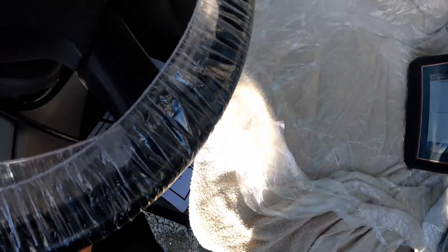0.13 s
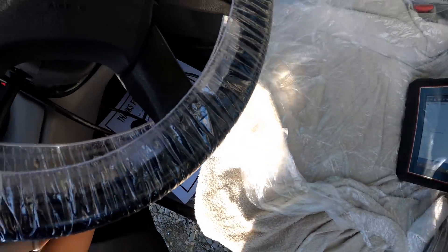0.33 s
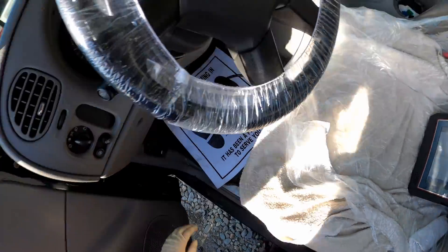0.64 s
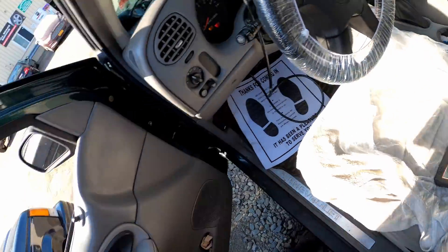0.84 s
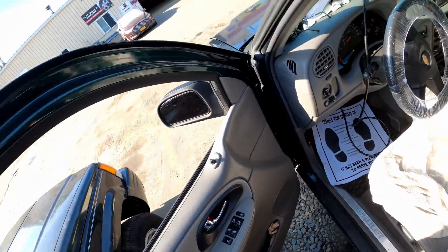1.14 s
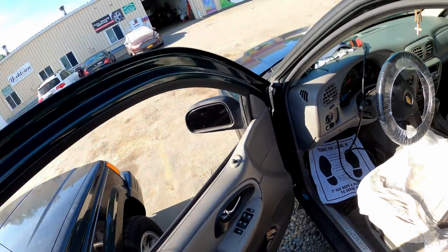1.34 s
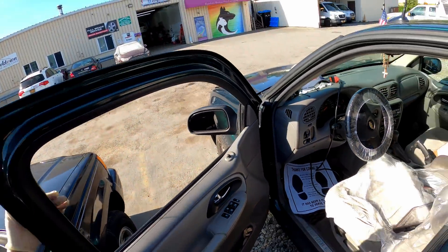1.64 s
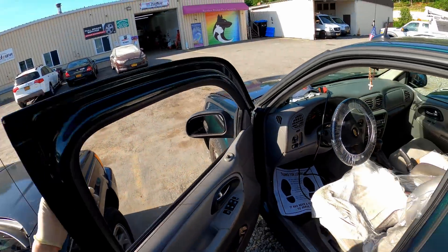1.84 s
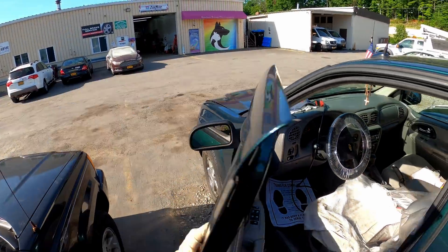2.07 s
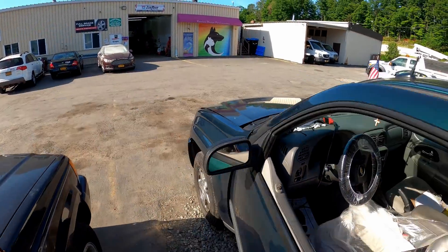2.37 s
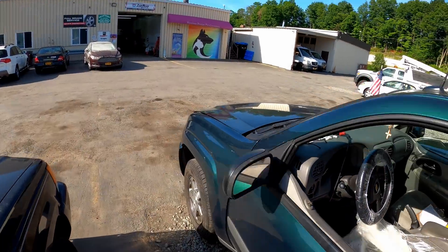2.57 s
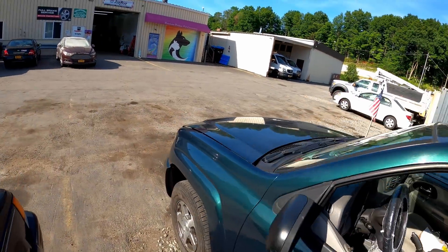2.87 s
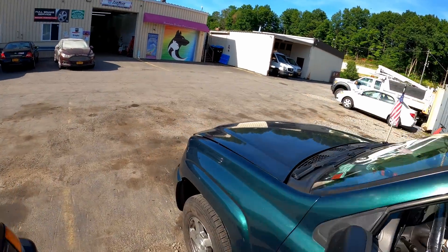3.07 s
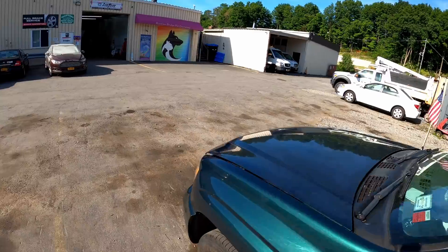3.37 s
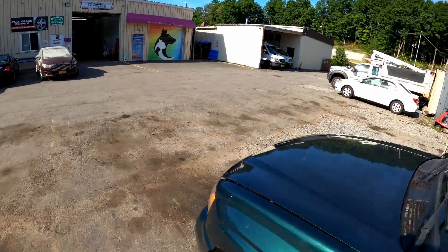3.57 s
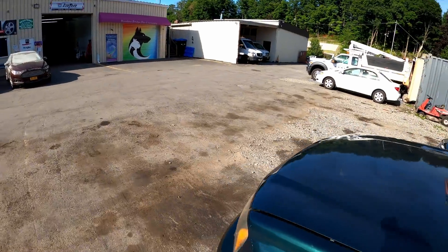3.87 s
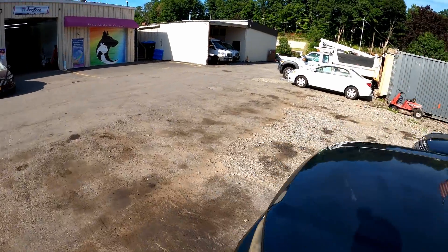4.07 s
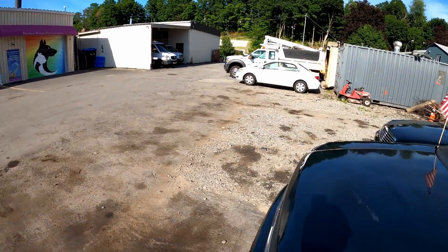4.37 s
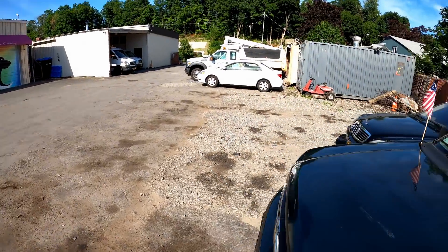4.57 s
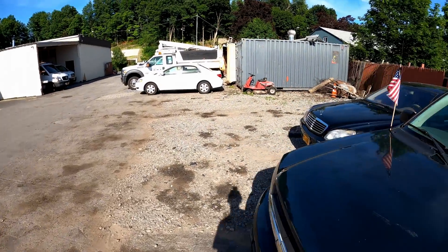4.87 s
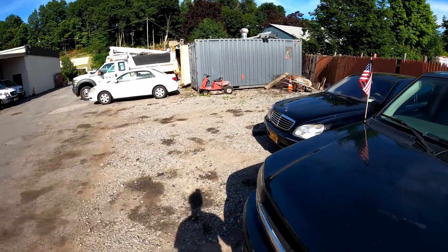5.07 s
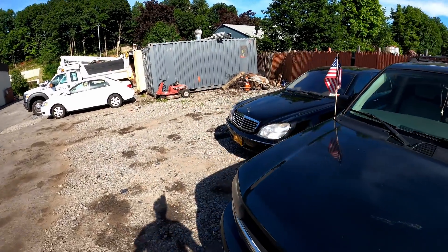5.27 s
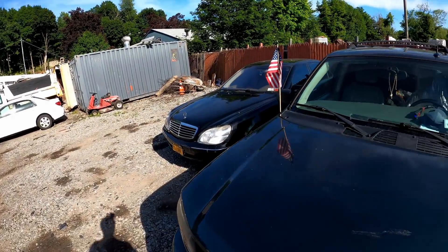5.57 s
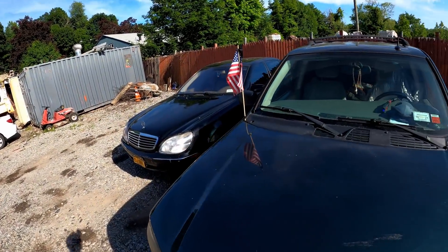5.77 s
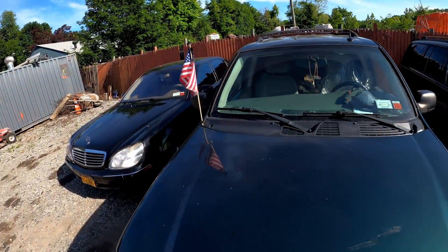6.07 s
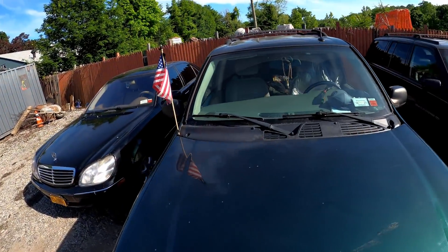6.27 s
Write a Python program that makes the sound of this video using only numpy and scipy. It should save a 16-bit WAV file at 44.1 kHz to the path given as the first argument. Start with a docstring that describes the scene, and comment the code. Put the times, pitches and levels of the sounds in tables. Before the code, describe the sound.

A car bonnet release snaps and the bonnet pops with a deep boom, shoes crunch on gravel in wind, a door slams, then a duller clunk.

```python
"""An open yard, heard from a windblown body-worn camera: a mechanic pulls a car's bonnet release, the bonnet
pops and the lever snaps back; he steps out onto gravel, slams the door, and at the front a duller clunk and
latch clicks follow. Metal is decaying modes, coloured noise and clicks; gravel is grains, stones and pebbles.
Wind is low swirling noise, the bird gliding raspy notes; squeaks, cloth and a distant wash lie underneath."""
import sys
import numpy as np
from scipy import signal
from scipy.fft import rfft, irfft, next_fast_len
from scipy.io import wavfile
from scipy.ndimage import map_coordinates

SR = 44100
rng = np.random.default_rng(int(sys.argv[2]) if len(sys.argv) > 2 else 0)


def pcm_store(signal):
    """Save signal as 16-bit PCM."""
    levels = np.round(np.clip(np.atleast_2d(signal), -1, 1) * 32767)
    wavfile.write(sys.argv[1], SR, levels.astype(np.int16).T)


N = 282681
TIME = np.arange(N) / SR  # s, the whole scene
RING = np.arange(32768) / SR  # s, the longest single ring

# Colour of lever and latch contacts. Each row: frequency in Hz, level in dB per Hz.
LEVER_COLOUR = [(120, -22), (250, -1.5), (700, 6.5), (1100, 5), (2100, -1.5), (4100, -4), (5200, -10.5),
                (7200, -10.5), (10000, -15), (13500, -21), (15500, -47.5)]
# How fast door and clunk sheet metal dies. Each row: frequency in Hz, t60 in s.
PANEL_DECAY = [(100, 0.36), (400, 0.16), (1200, 0.29), (4000, 0.21)]
# Colour of one stone on another. Each row: frequency in Hz, level in dB per Hz.
STONE_COLOUR = [(150, -20), (500, 6), (1300, 2.5), (4000, -4.5), (7000, -7), (11000, -15), (15500, -37)]


def amp(db):
    """Decibels to gain."""
    return 10 ** (np.asarray(db) / 20)


def unit(x):
    """Scale to rms 1."""
    return x / np.sqrt(np.mean(x ** 2) + 1e-20)


def along(points, hz):
    """(Hz, value) points read on a log frequency axis."""
    f, v = np.transpose(points)
    return np.interp(np.log(hz + 1), np.log(f + 1), v)


def curve(points):
    """(s, value) points read at every sample."""
    s, v = np.transpose(points)
    return np.interp(TIME, s, v)


def wobble(rate):
    """A smooth random curve, rate knots a second."""
    knots = rng.standard_normal(int(N * rate / SR) + 4)
    return map_coordinates(knots, [TIME * rate])


def filtered(x, response):
    """x times a response of frequency."""
    n = x.shape[-1]
    m = next_fast_len(n + n // 8, True)
    return irfft(rfft(x, m) * response(np.fft.rfftfreq(m, 1 / SR)), m)[..., :n]


def coloured(x, spectrum):
    """x with a (Hz, dB) colour, at rms 1."""
    return unit(filtered(x, lambda hz: amp(along(spectrum, hz))))


def stressed(x, spectrum, pitch_hz, octaves):
    """x in a material's colour, stressed around a pitch, at rms 1."""
    def response(hz):
        distance = np.log2((hz + 1) / pitch_hz) / octaves
        return amp(along(spectrum, hz)) / (1 + distance ** 2)
    return unit(filtered(x, response))


def ports_noise(spread):
    """Noise for two ports: a common part plus each port's own part."""
    return rng.standard_normal(N) + spread * rng.standard_normal((2, N))


def add(track, s, sound):
    """Mix a sound in at s seconds."""
    part = track[max(round(s * SR), 0):][:len(sound)]
    part += sound[:len(part)]


def fade(t, t60):
    """Exponential decay by 60 dB in t60 seconds, 2 ms at the least."""
    return np.exp(-np.log(1000) * t / max(t60, .002))


def onset(t, attack_s):
    """Exponential rise towards full level."""
    return 1 - np.exp(-t / attack_s)


def dying(spectrum, decay):
    """Countless close modes: noise in which each frequency dies at its own speed."""
    noise = coloured(rng.standard_normal(len(RING)), spectrum)
    hz, t, z = signal.stft(noise, SR, nperseg=256)
    z = z * amp(-60 * t / along(decay, hz)[:, None])
    return signal.istft(z, SR, nperseg=256)[1][:len(RING)]


def ringing(modes):
    """Free modes as decaying sines, a little different in strength at every blow."""
    out = np.zeros(len(RING))
    for hz, db, t60 in modes:
        strength = amp(db + rng.normal(0, 1))
        out += strength * fade(RING, t60) * np.sin(2 * np.pi * hz * RING)
    return out


def click(spectrum, pitch_hz, t60, octaves, tail_db):
    """A small hard contact: a noise crack and a fainter tail that lasts four times as long."""
    t = RING[:len(RING) // 4]
    body = stressed(rng.standard_normal(len(t)), spectrum, pitch_hz, octaves)
    return body * (fade(t, t60) + amp(tail_db) * fade(t, 4 * t60)) * onset(t, 0.00099)


def slam(contacts, modes, panel, decay, attack_s):
    """Each contact swings the whole body, rings its sheet metal and sets loose parts chattering."""
    # Loose trim. Each row: frequency in Hz, level in dB per Hz.
    rattle_colour = [(500, -18), (1200, 8.5), (2200, -9), (4200, -17.5), (6000, -22.5), (10000, -32.5),
                     (15000, -47)]
    # How fast the trim falls quiet. Each row: frequency in Hz, t60 in s.
    rattle_decay = [(1000, 0.11), (4000, .15), (12000, 0.056)]
    out = np.zeros(N)
    for s, boom_db, panel_db, rattle_db in contacts:
        boom = amp(boom_db) * ringing(modes)
        metal = amp(panel_db) * dying(panel, decay)
        chatter = unit(amp(2.7 * wobble(420)[:len(RING)]))
        rattle = amp(rattle_db) * chatter * dying(rattle_colour, rattle_decay)
        add(out, s, (boom + metal + rattle) * onset(RING, attack_s))
    return out


def bonnet():
    """The bonnet pops: a deep boom with long-ringing sheet metal."""
    # Heavy contacts. Each row: start in seconds, then boom, panel and rattle levels in dB.
    contacts = [(.346, -13, -13.5, -25), (.376, -41, -27, -25.5), (.402, -45.5, -26, -26),
                (.438, -42, -30.5, -32.5), (.603, -26, -34.5, -52.5)]
    # Free modes. Each row: frequency in Hz, level in dB, t60 in s.
    modes = [(29, -0.5, 0.87), (53, -3, .55), (70, -6, 0.76), (94.4, -8.5, 0.34), (151.6, -4, .4),
             (231, -16, 0.19), (548, -23, 0.67), (1280, -32, .3), (1630, -26.5, 0.44)]
    # Sheet metal. Each row: frequency in Hz, level in dB per Hz.
    panel = [(40, -5.5), (90, 3.5), (250, -3), (380, -10.5), (500, -8.5), (750, -17), (1050, -13),
             (1400, -17), (2000, -19), (4000, -37.5), (8000, -61)]
    decay = [(100, 0.59), (400, 0.47), (1200, 0.37), (4000, 0.046)]  # Hz, t60 in s
    return slam(contacts, modes, panel, decay, attack_s=.004)


def lever():
    """The release lever takes up slack, trips the catch and snaps back against the kick panel."""
    # Blows in the footwell. Each row: start in seconds, crack in dB, pitch in Hz, ring in dB, knock in dB.
    blows = [(0.1365, -17.5, 2920, -31.5, -29.5), (0.1959, -27, 5150, -40, -48),
             (0.3416, -13, 4600, -24, -26.5), (0.5985, -12, 2700, -18, -25), (0.6008, -12, 5070, -30, -21)]
    # Modes of lever and catch, damped further below. Each row: frequency in Hz, level in dB, t60 in s.
    lever_modes = [(1032, -1, 0.21), (1743, -1, 0.099), (2100, 3, 0.026), (2680, 0, 0.028), (3350, 2, .063),
                   (3575, 8, 0.069), (3940, 5, 0.14), (4177, 2, 0.16), (4660, -27, 0.052),
                   (6970, -5.5, 0.07)]
    # Plastic kick panel. Each row: frequency in Hz, level in dB per Hz.
    knock_colour = [(60, -19.5), (130, 6), (260, -2.5), (400, -7), (700, -20.5), (1100, -27), (2000, -37.5),
                    (5000, -63.5)]
    out = np.zeros(N)
    for s, crack_db, pitch_hz, ring_db, knock_db in blows:
        crack = click(LEVER_COLOUR, pitch_hz, t60=0.021, octaves=0.6, tail_db=-14.5)
        ring = ringing(lever_modes) * fade(RING, .08) * onset(RING, 0.0014)
        knock = dying(knock_colour, [(150, 0.13), (1200, 0.13)]) * onset(RING, .0012)
        add(out, s, amp(crack_db) * crack)
        add(out, s, amp(ring_db) * ring)
        add(out, s, amp(knock_db) * knock)
    return out


def door():
    """The door slams: a quick, bright impact over the modes and sheet metal of its shell."""
    # Heavy contacts. Each row: start in seconds, then boom, panel and rattle levels in dB.
    contacts = [(2.790, -36, -22.5, -24), (2.798, -35, -16.5, -26), (2.813, -29, -11, -28.5),
                (2.826, -16, -30, -37), (2.856, -33, -20.5, -25.5), (2.874, -31, -15, -28.5),
                (2.936, -22, -27.5, -36.5), (3.05, -32.5, -38.5, -53)]
    # Free modes. Each row: frequency in Hz, level in dB, t60 in s.
    modes = [(48.5, 7, 0.34), (69, -1.5, 0.19), (108.2, -7.5, 0.31), (126.8, -6.5, 0.27), (162, -10, 0.4),
             (255, -22, 0.14), (278.4, -14.5, 0.28), (346, -14.5, 0.34), (494, -19, 0.79),
             (570, -16.5, 0.33), (689, -23.5, 0.34), (1390, -33, 0.39), (1700, -36.5, 0.6),
             (2600, -37.5, 0.52)]
    # Sheet metal. Each row: frequency in Hz, level in dB per Hz.
    panel = [(40, -17.5), (100, 1.5), (200, -5), (300, 2), (400, -0.5), (550, -9), (1000, -18.5),
             (1400, -28), (2200, -28.5), (4000, -30.5), (8000, -64.5)]
    return slam(contacts, modes, panel, PANEL_DECAY, attack_s=0.0006)


def clunk():
    """The duller clunk at the front, on long-ringing low modes."""
    # Heavy contacts. Each row: start in seconds, then boom, panel and rattle levels in dB.
    contacts = [(5.238, -36, -25.5, -29), (5.264, -22, -16.5, -50.5), (5.327, -38.5, -22.5, -41),
                (5.402, -35.5, -42, -50)]
    # Free modes. Each row: frequency in Hz, level in dB, t60 in s.
    modes = [(42.8, -11, 1), (71.4, -6, 0.95), (131.2, -7, 0.89), (188.3, -6, 0.42), (265.6, -12, 0.73),
             (385, -8, 0.19), (510, -23, 0.27), (786, -31, 0.18), (3330, -30, 0.48)]
    # Sheet metal. Each row: frequency in Hz, level in dB per Hz.
    panel = [(50, -41), (130, 1.5), (300, 1), (470, 2.5), (620, -10.5), (850, -5), (1300, -19.5),
             (2000, -23), (3500, -29.5), (7000, -62.5)]
    return slam(contacts, modes, panel, PANEL_DECAY, attack_s=0.00082)


def latch_clicks():
    """Trim, catch and latches: small hard parts that crack and die quickly."""
    # Each row: start in seconds, level in dB, pitch in Hz.
    contacts = [(0.182, -32.5, 3020), (0.217, -35, 3610), (.226, -34, 1510), (0.276, -37, 4730),
                (2.796, -21, 1190), (2.812, -13.5, 600), (2.8124, -21, 2650), (2.873, -29, 3900),
                (2.928, -46, 6000), (2.941, -41, 4000), (3.113, -45.5, 1480), (5.237, -35, 2980),
                (5.327, -34, 3240), (5.515, -31.5, 1000), (5.531, -34, 3700), (5.549, -26.5, 2420),
                (5.627, -39, 1220), (6.335, -37.5, 1440), (6.400, -29, 1260)]
    out = np.zeros(N)
    for s, db, pitch_hz in contacts:
        add(out, s, amp(db) * click(LEVER_COLOUR, pitch_hz, t60=0.031, octaves=0.8, tail_db=-14))
    return out


def swing():
    """Air rushes round the door as it sweeps shut: noise under an uneven level curve."""
    # The sweep. Each row: time in seconds, level in dB.
    sweep = [(2.05, -75.5), (2.2, -47), (2.45, -52.5), (2.6, -50), (2.78, -45.5), (2.82, -73.5)]
    # Colour of the rush. Each row: frequency in Hz, level in dB per Hz.
    whoosh = [(150, -9), (450, 3.5), (900, -4), (1500, -15.5), (3000, -32.5), (8000, -49)]
    level_db = curve(sweep) + 0.61 * wobble(35)
    return amp(level_db) * coloured(rng.standard_normal(N), whoosh)


def crunch():
    """Soles grind on gravel: tiny grains in clumps, coloured and stressed around a pitch."""
    # Each row: middle in seconds, length in seconds, level in dB, pitch in Hz.
    grinds = [(1.244, 0.078, -44, 3000), (1.524, 0.12, -35, 1660), (1.6, 0.05, -37, 2290),
              (1.671, 0.055, -45, 2230), (1.851, 0.11, -32, 2780), (2.027, 0.063, -38, 3230),
              (2.064, 0.056, -31.5, 1950), (2.234, 0.07, -32.5, 870), (2.277, 0.19, -54.5, 5800),
              (4.537, 0.24, -58, 3420), (6.381, .09, -53, 1500)]
    # Colour of the gravel. Each row: frequency in Hz, level in dB per Hz.
    gravel = [(150, 26), (450, 19), (900, 1), (1800, -5.5), (4200, -12), (7000, -11.5), (10000, -18.5),
              (13000, -26), (15500, -56.5)]
    grains_per_s, clumps_per_s, clump_db = 1900, 260, 2.5
    out = np.zeros(N)
    for s, length, db, pitch_hz in grinds:
        n = int(length * SR)
        # sparse large grains over a fine noise bed
        size = 0.21 + (rng.random(n) < grains_per_s / SR)
        grains = rng.standard_normal(n) * size
        clumped = grains * amp(clump_db * wobble(clumps_per_s)[:n])
        grit = stressed(clumped, gravel, pitch_hz, octaves=0.94)
        add(out, s - length / 2, amp(db) * np.hanning(n) * grit)
    return out


def stones():
    """The loudest stones knocked by the shoes: each a crack with a brief note of its own."""
    # Each row: start in seconds, level in dB, pitch in Hz.
    knocks = [(1.352, -32, 4100), (1.395, -32.5, 1390), (1.456, -28, 4250), (1.499, -24, 1220),
              (1.507, -25.5, 2350), (1.538, -30.5, 2420), (1.643, -31.5, 3000), (1.776, -31.5, 3020),
              (1.825, -22, 4080), (1.867, -21.5, 4020), (1.956, -31, 2420), (2.003, -34, 3380),
              (2.073, -28.5, 2060), (2.349, -36, 2290), (3.919, -36.5, 1391), (4.014, -40.5, 1250),
              (4.548, -31, 1055), (5.086, -37.5, 870)]
    note_db, note_t60_s = -21, 0.014  # the note relative to its crack
    out = np.zeros(N)
    for s, db, pitch_hz in knocks:
        crack = click(STONE_COLOUR, pitch_hz, t60=0.02, octaves=0.75, tail_db=-16)
        note = ringing([(pitch_hz, note_db, note_t60_s)]) * onset(RING, 0.0024)
        add(out, s, amp(db) * crack)
        add(out, s, amp(db) * note)
    return out


def pebbles():
    """Loose pebbles roll underfoot: ticks uneven in timing, level and pitch."""
    # Stepping out, then walking. Each row: start and end in seconds, mean gap in seconds, mean level in dB,
    # middle pitch in Hz.
    rolls = [(1.448, 2.15, .03, -41.5, 2970), (3.351, 5.3, 0.11, -40.5, 1450)]
    spread_db = -1
    out = np.zeros(N)
    for start, end, gap, db, pitch_hz in rolls:
        beats = np.arange(start, end, gap)
        for s, (late, size, sharp) in zip(beats, rng.standard_normal((len(beats), 3))):
            tick_hz = pitch_hz * 2 ** (sharp / 2)
            tick = click(STONE_COLOUR, tick_hz, t60=0.011, octaves=0.93, tail_db=-17.5)
            add(out, s + late * gap / 2, amp(db + spread_db * size) * tick)
    return out


def wind():
    """A lumpy rumble swells with each gust; gusts swirl at each port differently, the right one harder."""
    # Gusts as the camera swings. Each row: peak in seconds, length in seconds, level in dB midway between
    # the ports, upper edge in Hz at the right port.
    gusts = [(1.2, .3, -24.5, 202), (1.459, 0.038, -22.5, 214), (1.725, 0.101, -25.5, 193),
             (1.894, 0.15, -39, 145), (2.142, 0.18, -27, 210), (2.29, 0.13, -21.5, 241),
             (2.554, 0.14, -25, 223.6), (3.827, 0.17, -28.5, 123), (4.026, 0.15, -34.5, 99),
             (5.9, 0.19, -39.5, 157)]
    # Steady breeze. Each row: time in seconds, rumble level in dB.
    breeze = [(0, -42), (.4, -38.5), (.84, -45.5), (1.2, -30.5), (2.2, -28.5), (2.75, -37.5), (3.3, -45),
              (3.9, -37), (5.0, -45), (5.5, -40.5), (6.41, -43.5)]
    # Colour of the rumble. Each row: frequency in Hz, level in dB per Hz.
    rumble_colour = [(15, -8.5), (28, 2), (55, 2.5), (85, -3.5), (130, -9), (250, -26), (600, -59.5),
                     (2000, -87.5)]
    rise = 0.38  # share of a gust spent swelling
    lee_edge = 0.77  # the sheltered left port gets only the slower eddies: its edge over the right one's
    gust_rumble_db = -3  # rumble that each gust brings, relative to its swirl
    out, rumble = np.zeros((2, N)), amp(curve(breeze))
    for s, length, db, edge_hz in gusts:
        u = (TIME - s) / length
        swell = np.exp(-(u / np.where(u < 0, rise, 1 - rise)) ** 2 * 2)
        edges = edge_hz * np.array([[lee_edge], [1]])
        swirl = filtered(ports_noise(1.62), lambda hz: hz / (hz + 70) / np.sqrt(1 + (hz / edges) ** 8))
        out += amp(db) * swell * unit(swirl) * amp([[-2], [2]])  # dB, left and right
        rumble = rumble + amp(db + gust_rumble_db) * swell
    lumps = amp(1.4 * wobble(8.4))
    return out + rumble * lumps * coloured(ports_noise(1.2), rumble_colour)


def rustle():
    """Clothes and seat cover brush past in uneven strokes of noise."""
    # The strokes. Each row: time in seconds, level in dB.
    strokes = [(0, -59), (.2, -49), (.3, -52.5), (.45, -48), (.62, -60), (.92, -68), (.97, -57.5),
               (1.25, -55.5), (1.9, -59), (3.15, -72.5), (3.9, -62.5), (4.9, -72.5), (5.45, -59.5),
               (5.8, -67), (6.41, -62)]
    # Colour of cloth. Each row: frequency in Hz, level in dB per Hz.
    cloth = [(600, 0), (1500, 3.5), (3000, 1), (5000, -4.5), (8000, -16.5), (10000, -18.5), (12000, -31.5),
             (15000, -47)]
    return amp(curve(strokes) + 1.1 * wobble(44)) * coloured(ports_noise(.4), cloth)


def whistle(hz):
    """A pure note on a pitch track, swelling and fading."""
    return np.sin(2 * np.pi * np.cumsum(hz) / SR) * np.hanning(len(hz))


def bird_trill():
    """The bird swells into a buzzing run of short, raspy syllables, its notes taking turns."""
    # Notes that alternate. Each row: middle pitch in Hz, level in dB, length in s, rasp in Hz, glide in Hz per s.
    notes = [(4470, 2, 0.028, 100, 3503), (3290, -0.5, 0.0597, 250, 2003), (2700, -2, 0.0356, 327, -24000),
             (4040, -9, 0.0488, 324, 9008)]
    # Trills. Each row: start in seconds, end in seconds, level in dB.
    song = [(0.676, 1.342, -62), (3.39, 4.55, -58.5)]
    gap_s, scatter_s, spread_db, swell_s = .041, .005, 3.5, 0.11  # pace, unevenness and onset
    out = np.zeros(N)
    for k, (pitch_hz, note_db, length, rasp_hz, glide) in enumerate(notes):
        t = RING[:int(length * SR)] - length / 2
        rasp = rasp_hz * wobble(900)
        for start, end, db in song:
            beats = np.arange(start + gap_s * k / len(notes), end, gap_s)
            for s, (late, loud) in zip(beats, rng.standard_normal((len(beats), 2))):
                effort_db = -9 * np.exp(-(s - start) / swell_s) + spread_db * loud
                note = whistle(pitch_hz + glide * t + rasp[int(s * SR):][:len(t)])
                add(out, s + scatter_s * late, amp(db + note_db + effort_db) * note)
    return out


def squeaks():
    """Faint squeaks and whistles: single notes roughened by a trembling pitch."""
    # Each row: start in seconds, length in seconds, middle pitch in Hz, level in dB.
    cries = [(0, 0.12, 2023, -54), (5.776, 0.23, 2616, -60), (5.853, 0.14, 2820, -66),
             (6.279, 0.045, 553, -41.5)]
    out = np.zeros(N)
    for s, length, hz, db in cries:
        tremble = .025 * wobble(214)[:int(length * SR)]
        add(out, s, amp(db) * whistle(hz * (1 + tremble)))
    return out


def yard():
    """The wash of distant traffic and trees: coloured noise that slowly comes and goes."""
    # Colour of the distance. Each row: frequency in Hz, level in dB per Hz.
    wash = [(88, -45), (150, -2.5), (286, -8.5), (395, -8), (672, -17), (1140, -17), (2060, -28),
            (2630, -29.5), (3570, -37), (6190, -47), (14000, -74.5)]
    # How loud it stands. Each row: time in seconds, level in dB.
    wash_level = [(0, -57.5), (.9, -60), (2, -44.5), (3.0, -58), (4.2, -50.5), (5.9, -51.5), (6.41, -48)]
    return amp(curve(wash_level)) * coloured(ports_noise(0.22), wash)


def echo(x, decay):
    """Surfaces answer each port with a dying noise tail of its own."""
    colour = [(100, -16.0), (3000, -7.0), (12000, -3.5)]  # Hz, dB
    tails = np.array([dying(colour, decay) for _ in range(2)])
    return signal.fftconvolve(x[None], tails / np.linalg.norm(tails[0]), axes=1)[:, :N]


def at_ports(near):
    """Near sounds reach the left port a moment late and in a different colour from the right."""
    # Left port over right. Each row: frequency in Hz, level difference in dB.
    shade = [(500, 1.5), (1400, 3.5), (3200, 4), (6000, -0.5), (11000, -1)]
    lag_s = 2e-5  # left behind right
    sides = np.array([[1], [-1]])  # each port takes half the difference

    def response(hz):
        delay = np.exp(-1j * np.pi * hz * lag_s * sides)
        return delay * amp(along(shade, hz) * sides / 2)
    return filtered(near, response)


def scene():
    """Near sounds bounce off the bodywork; the walls of the yard answer them and, strongly, the chirps."""
    # Walls of the yard. Each row: frequency in Hz, t60 in s.
    walls = [(150, 0.3), (1500, 0.72), (5000, 0.23), (10000, .1)]
    car = bonnet() + lever() + door() + clunk() + latch_clicks()
    near = car + crunch() + stones() + pebbles()
    far = bird_trill() + squeaks()
    bodywork = amp(-8) * echo(near, [(150, 0.016), (10000, 0.0029)])
    distant = far + amp(-3.0) * echo(far, walls) + amp(-30.0) * echo(near, walls)
    return at_ports(near) + bodywork + distant + swing() + wind() + rustle() + yard()


def record(dry):
    """The image narrows almost to mono partway through; high peaks are rounded; the top is cut off."""
    # Stereo image. Each row: time in seconds, width as a share.
    width = [(0, 1), (2.7, 1), (2.8, 0.25), (3.05, 0.031)]
    top_hz = 15650
    mid = dry.mean(axis=0)
    narrowed = mid + (dry - mid) * np.clip(curve(width), 0, 1)
    rounded = narrowed / (1 + (narrowed / .72) ** 6) ** (1 / 6)  # never beyond 0.72
    return filtered(rounded, lambda hz: hz < top_hz)


dry = scene()
out = record(dry)
pcm_store(out)
```